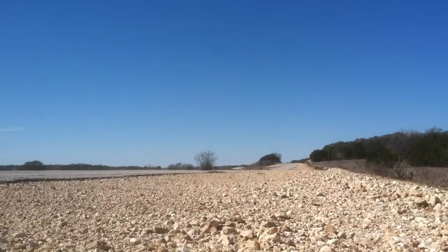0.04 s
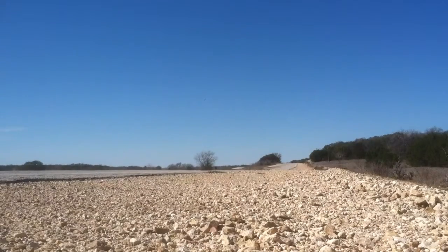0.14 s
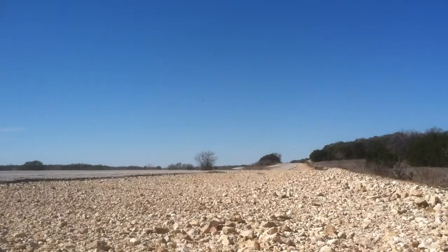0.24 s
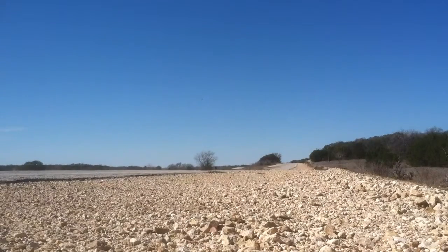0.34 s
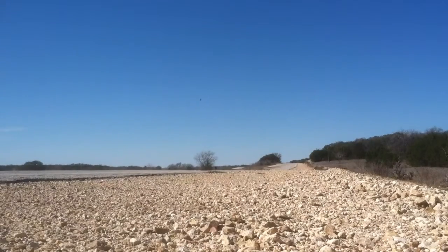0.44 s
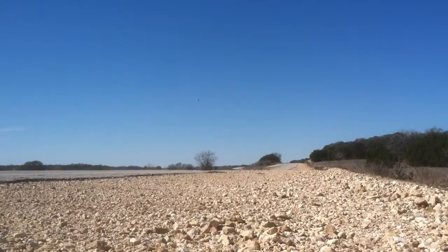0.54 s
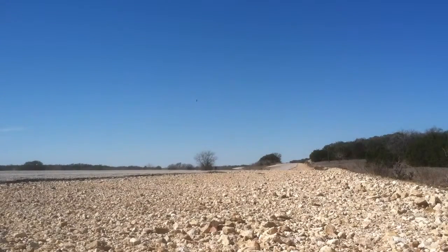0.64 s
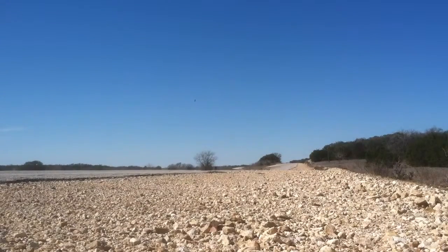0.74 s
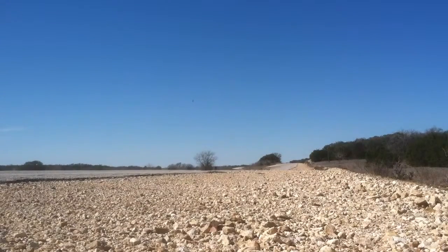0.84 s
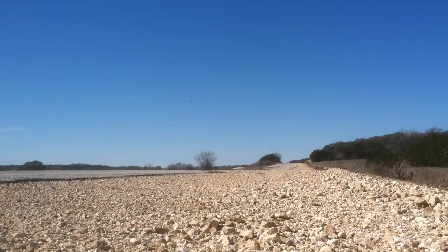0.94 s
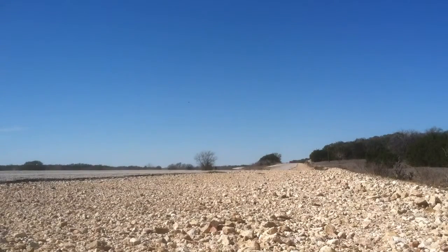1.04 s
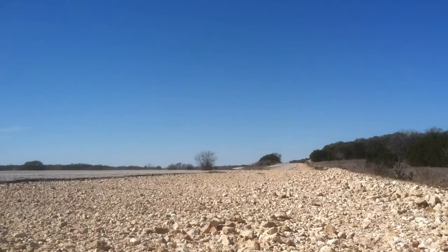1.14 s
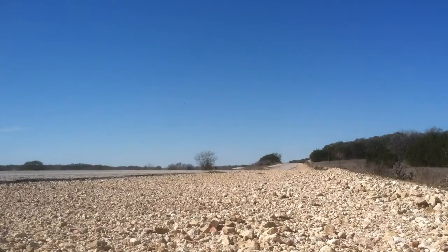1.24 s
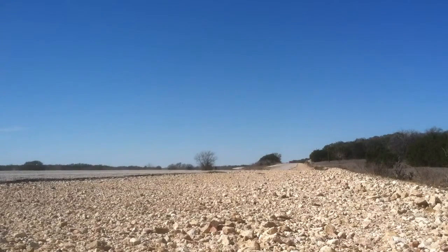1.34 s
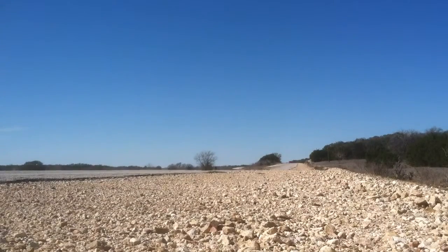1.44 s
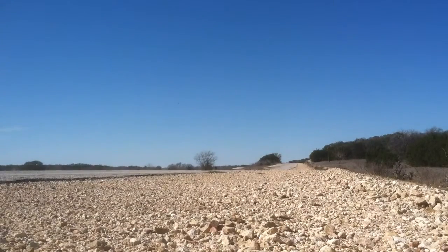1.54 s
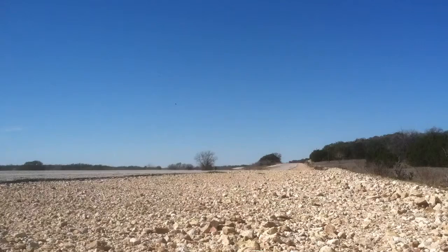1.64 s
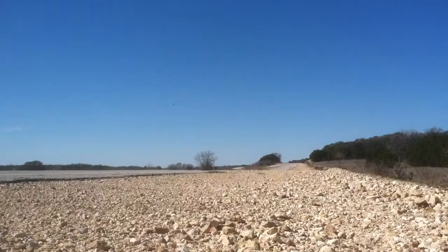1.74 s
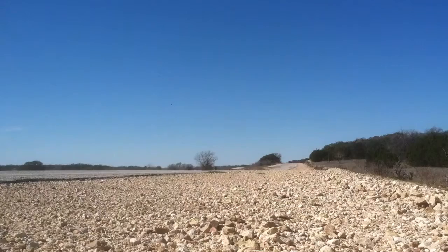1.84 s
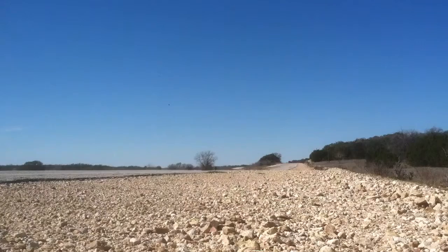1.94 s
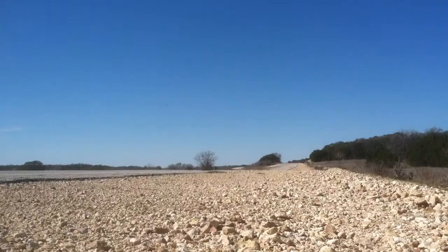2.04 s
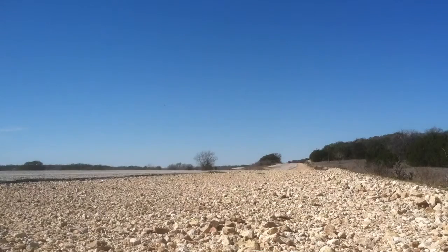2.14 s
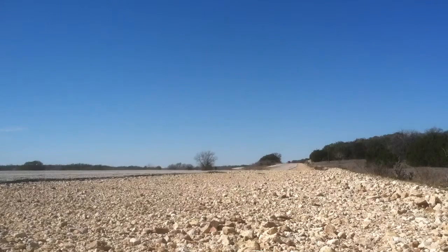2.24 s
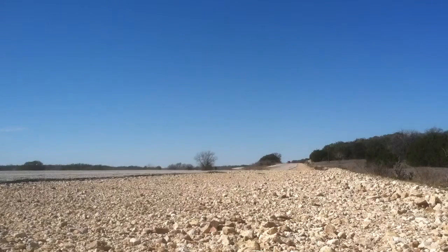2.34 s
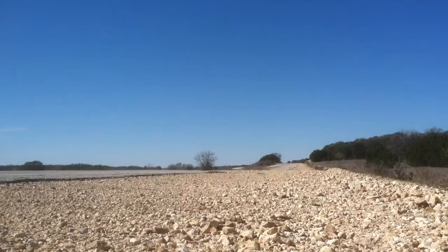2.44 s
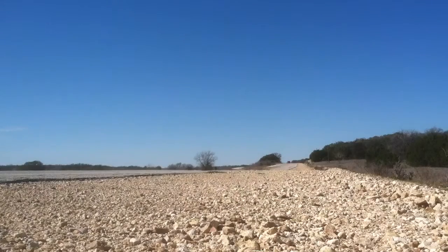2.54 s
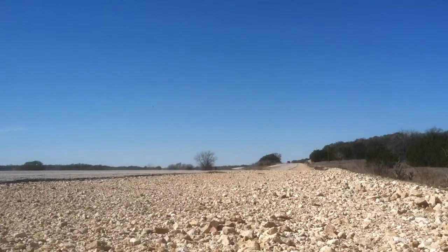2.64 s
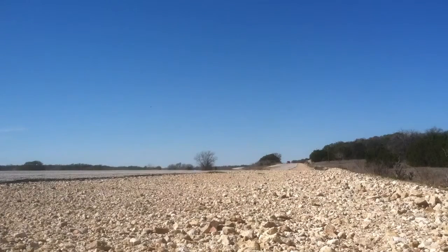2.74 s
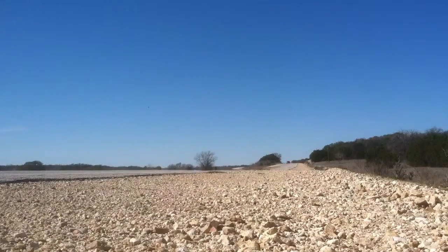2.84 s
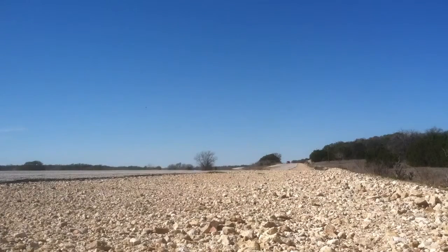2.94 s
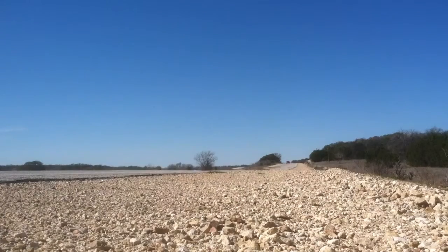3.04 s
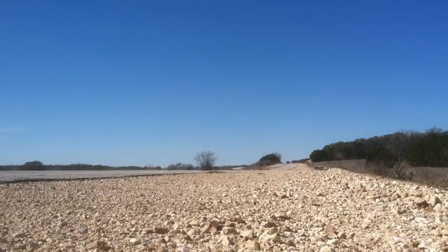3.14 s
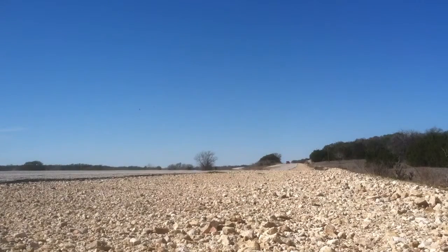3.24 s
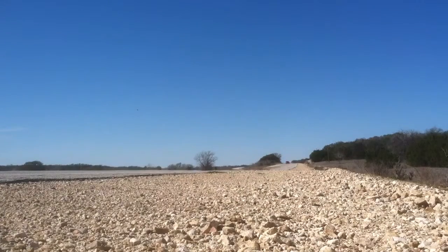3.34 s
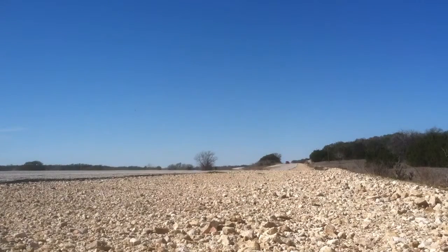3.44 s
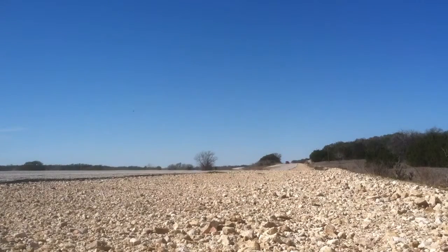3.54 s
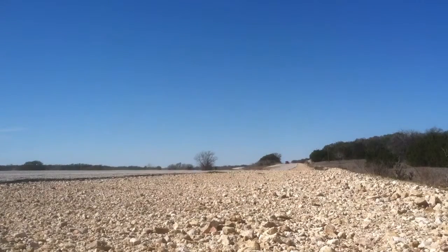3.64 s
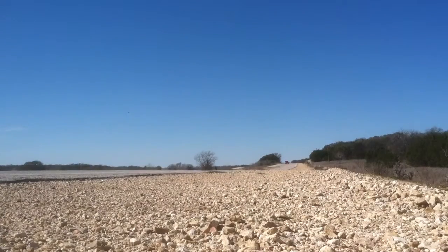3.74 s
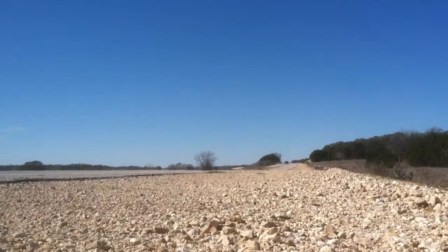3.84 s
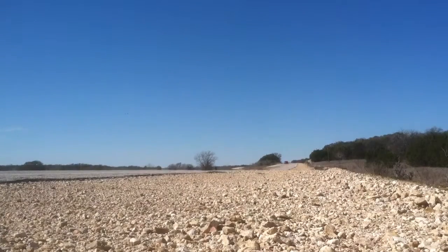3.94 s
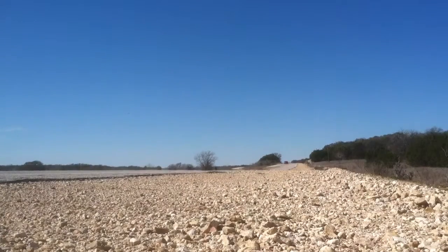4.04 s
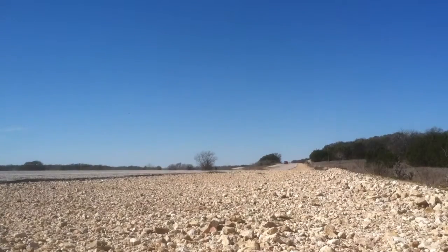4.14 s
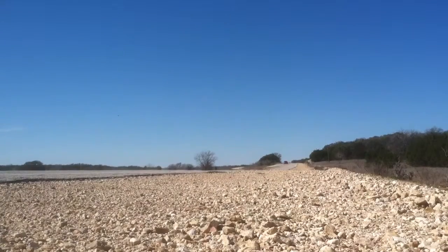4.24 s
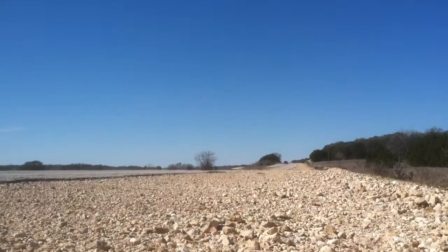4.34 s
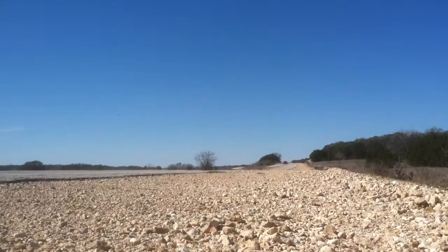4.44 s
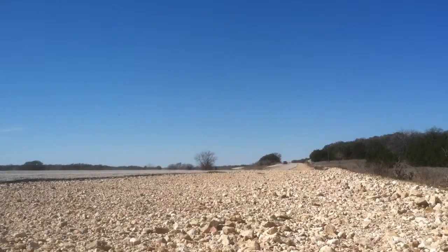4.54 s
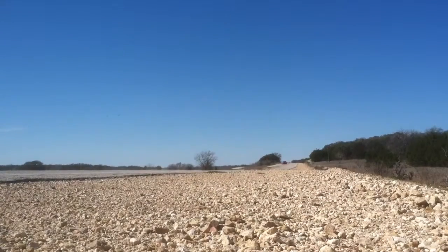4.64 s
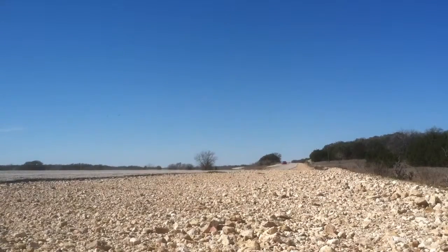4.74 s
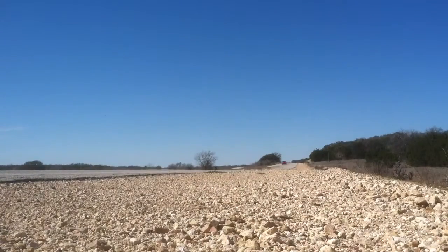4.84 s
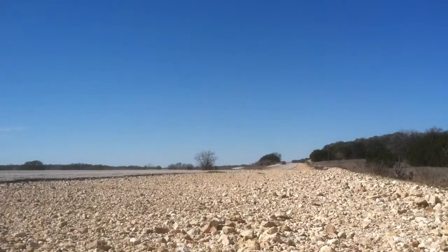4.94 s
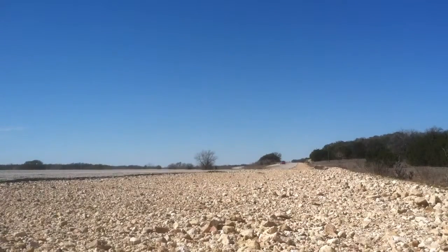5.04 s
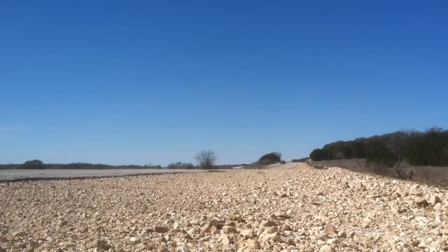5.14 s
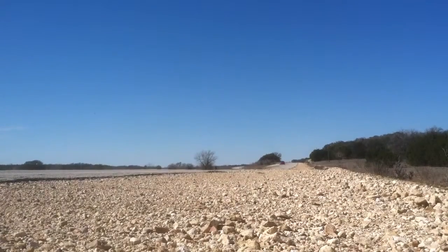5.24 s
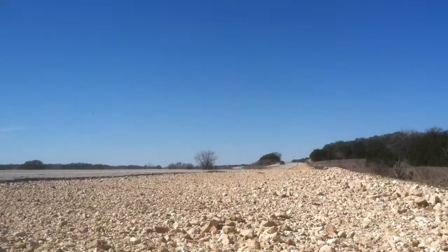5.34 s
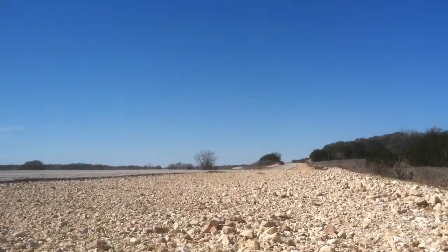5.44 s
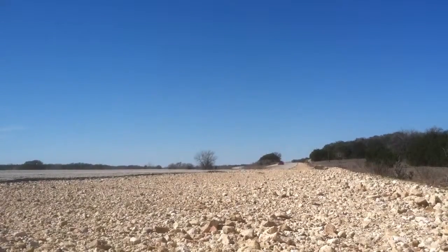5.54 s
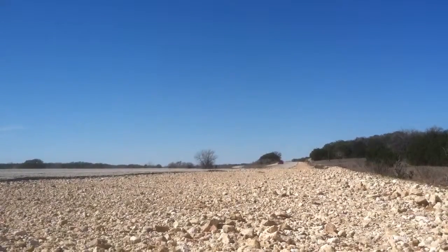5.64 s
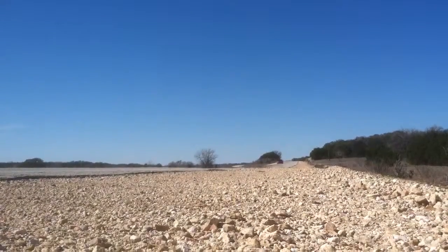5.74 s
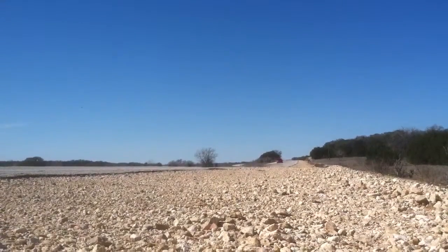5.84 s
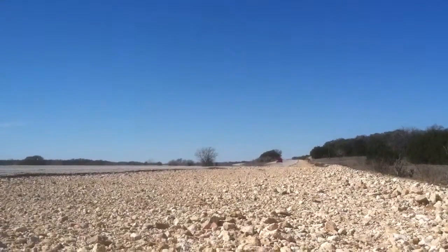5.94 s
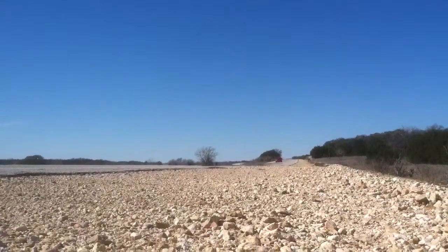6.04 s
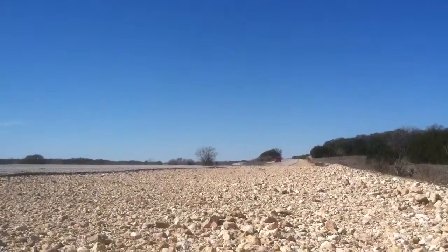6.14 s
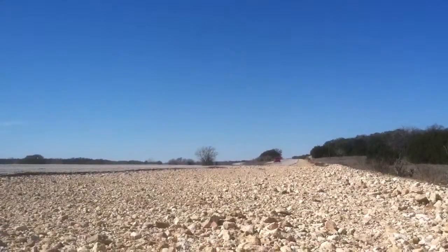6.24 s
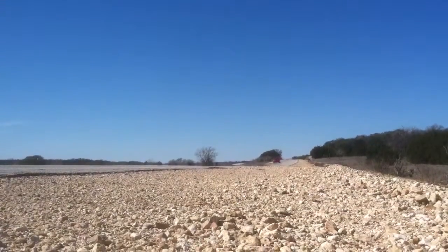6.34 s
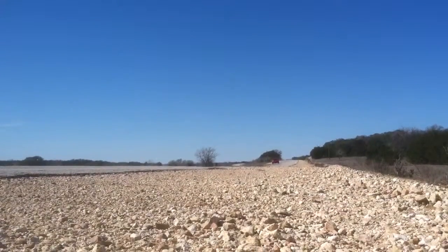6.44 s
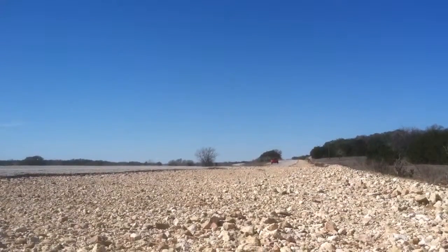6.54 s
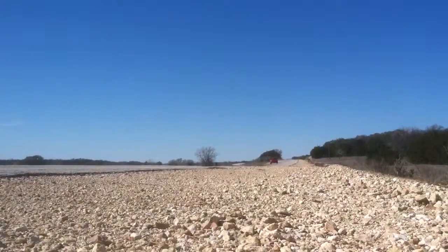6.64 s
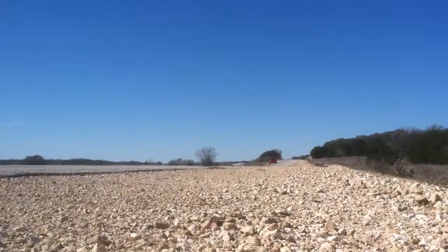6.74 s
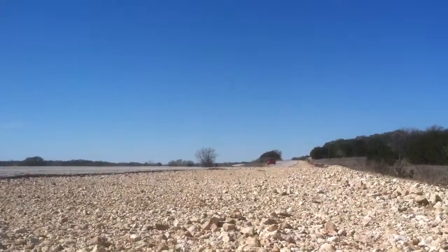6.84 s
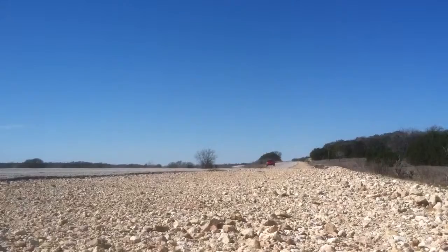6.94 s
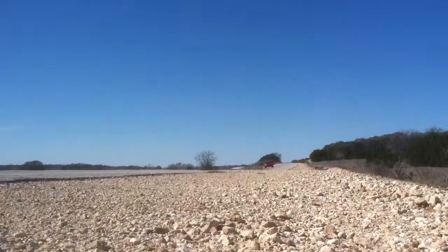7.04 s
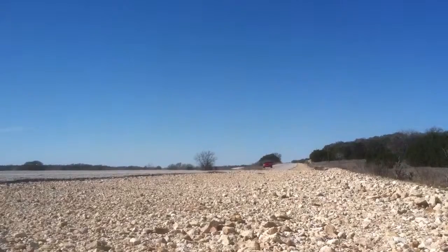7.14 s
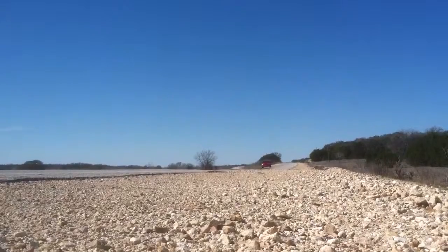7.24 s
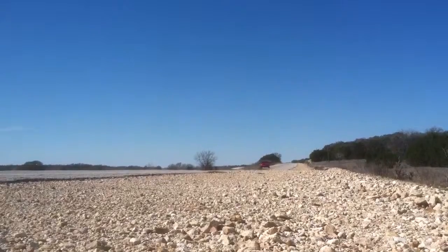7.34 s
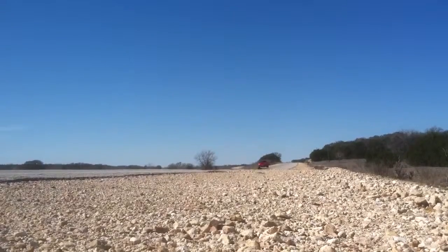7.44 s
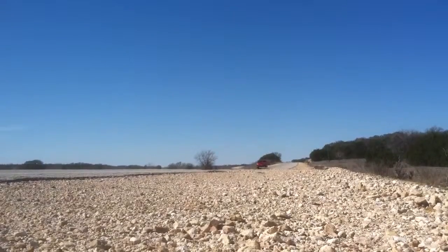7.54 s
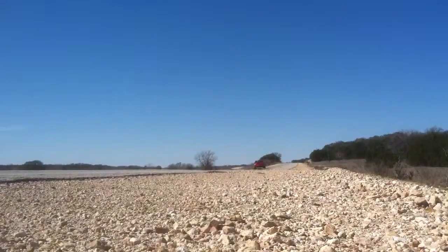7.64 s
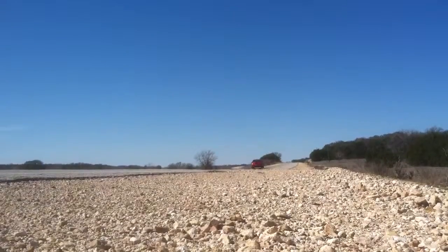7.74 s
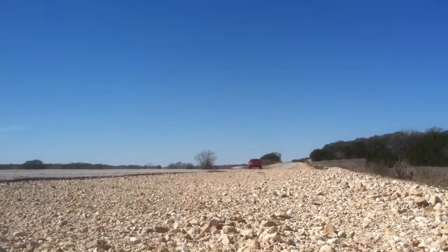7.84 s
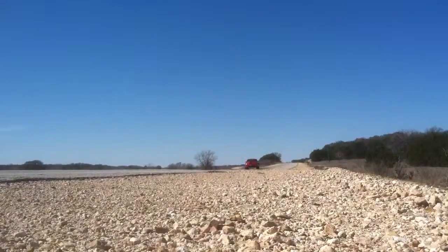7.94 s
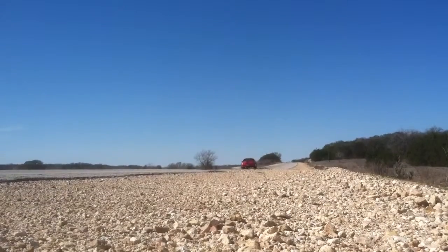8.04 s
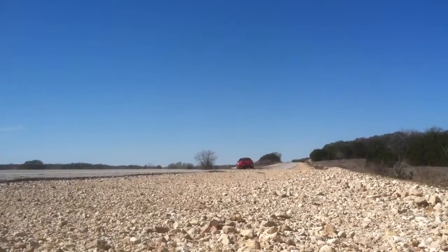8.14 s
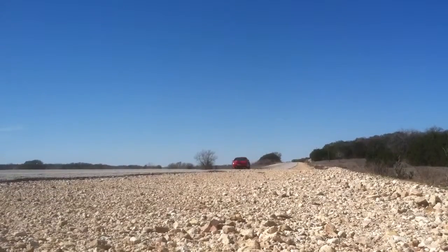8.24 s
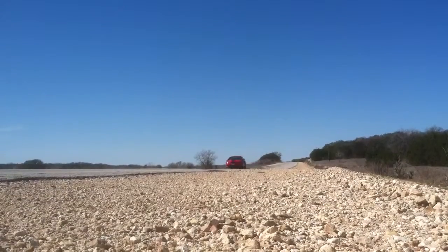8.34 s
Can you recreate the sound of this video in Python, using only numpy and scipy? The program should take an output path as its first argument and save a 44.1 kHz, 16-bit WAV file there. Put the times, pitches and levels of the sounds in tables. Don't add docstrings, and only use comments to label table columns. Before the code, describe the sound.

A powerful car approaches under continuous acceleration, starting as a quiet, fluttering hum over recorder hiss and climbing smoothly. Tiny stone ticks and soft wind bumps appear midway. In the last two seconds the exhaust becomes loud, throbbing and brighter, tyre noise rushes in and gravel snaps hard. Open, dry country air, microphone near the ground; the car never passes, and the end is a sudden cut.

```python
import sys
import numpy as np
from scipy import signal
from scipy.fft import rfft, irfft
from scipy.io import wavfile
from scipy.ndimage import uniform_filter1d

SR = 44100
rng = np.random.default_rng(int(sys.argv[2]) if len(sys.argv) > 2 else 0)


def invert_db(x):
    u = np.asarray(x, float) / 20
    return 10 ** u


def master(y):
    cut = np.clip(np.atleast_2d(y).T, -1, 1)
    pcm = np.round(cut * 32767)
    wavfile.write(sys.argv[1], SR, pcm.astype(np.int16))


N = 369999

# (time [s], rate [engine cycles per s])
REVS = [(0, 29.75), (.8, 32.57), (1.5, 35.11), (2.3, 38.1), (3.1, 41.32), (3.9, 44.42), (4.7, 47.68),
        (5.4, 50.24), (6.1, 52.73), (6.8, 55.02), (7.4, 57.15), (7.9, 58.66), (8.39, 60.16)]
# (time [s], nearness of exhaust note [dB], nearness of roar [dB], clearness of line of sight [dB])
CAR = [(0, -0.1, -1.5, 2.5), (.8, 5, -2, 2.5), (1.5, 2.2, 2, -3), (2.05, 3.5, 0.5, 2), (2.6, 7.5, 4, 0),
       (3.2, 4, 5, 4), (3.7, 5.5, 2, 3.5), (4.2, 2.5, 4.5, 0.5), (4.6, 7.5, 7, -1), (5.15, 11, 10.5, 0.5),
       (5.7, 12.5, 13.5, -6.5), (6.2, 14, 14, -4), (6.6, 18.5, 16, 6), (6.85, 20.5, 19.5, 0),
       (7.1, 23.5, 19.5, -3), (7.4, 21.5, 17, 9), (7.78, 25.5, 21.5, 10.5), (8.39, 31.5, 24.5, 2.5)]
# (multiple of cycle rate, rms level [dB])
STRONG = [(8, -55.5), (5, -70.5), (4, -77.5), (3, -78.5), (16, -69), (6, -74.5), (7, -75.5), (9, -63.5),
          (10, -68.5), (11, -71.5), (13, -74), (12, -73.5)]
# (multiple of cycle rate, level over the -72 dB they have from afar [dB])
WEAK = [(14, -5), (15, -5), (17, -11.5), (18, -8), (19, -12), (20, -14), (21, -13), (22, -13), (24, -14)]
# (time [s], multiple of cycle rate, swell [dB], half-length [s])
FADES = [(0, 7, -9.5, 2.0), (0, 8, -10.5, 0.15), (.09, 10, 8, .24), (.24, 13, 12.5, 0.33),
         (6.1, 11, 5.5, 1.2), (1.5, 10, -19, .69), (1.52, 16, 5.5, 0.37), (1.56, 8, -4, 2.3),
         (1.661, 9, -41, 0.5), (2.154, 16, 15, 0.17), (2.18, 6, -19, 0.69), (8.202, 12, 4, 0.26),
         (2.88, 5, -2, 0.6), (1.096, 16, -8.5, 0.23), (3.44, 16, 4, 0.45), (3.66, 8, -17.5, 0.55),
         (3.407, 9, -17, 0.63), (3.847, 8, 15.5, 0.25), (4.175, 7, 12, 0.2), (4.446, 5, -16, 0.064),
         (4.871, 10, 9, 0.78), (5.43, 12, 8.5, 0.73), (5.717, 16, -16, 0.49), (6.629, 7, 11.5, 0.8),
         (6.783, 5, 6, 1.06), (7.75, 9, -13.5, .65), (6.299, 10, 3.5, 0.66), (7.871, 3, -5, 0.24),
         (7.94, 10, -8.5, .74), (8.099, 18, 9.5, 0.34)]


def orders(cycle, flutter_db, fade_db, wobble):
    t = np.arange(N) / SR
    rate, = in_time(REVS)
    near_db = in_time(CAR)[0]
    levels = dict(STRONG)
    for k, db in WEAK:
        levels[k] = -72 + db + fade_db * drift(2.0)

    out = 0
    for k, order_db in levels.items():
        db = order_db + near_db + np.interp(t, t[::64], pipe_db(k * rate[::64]))
        for s, order, swell_db, half_s in FADES:
            if order == k:
                db = db + swell_db * bell(t, s, half_s)
        if k > 10:
            db = db + 2.0 * drift(22)
        order_wobble = wobble * (4 if k > 18 else 1)
        phase = k * (cycle + order_wobble * drift(7.7)) + rng.uniform(0, 2 * np.pi)
        order_flutter_db = flutter_db * (1.0 if k in (8, 5, 4) else 1.5)
        out = out + np.sqrt(2) * invert_db(db + order_flutter_db * drift(5.0)) * np.sin(phase)
    return out


# (frequency [Hz], width [Hz], gain [dB])
PIPE = [(171.5, 40.7, 16.5), (185, 4.5, -7), (217.9, 18.7, 10.5), (243.5, 33.7, 10.5), (327, 33.5, 12.5),
        (349.5, 6, -8), (378, 8.2, -2.5), (394.6, 8, 2.5), (437, 25, 3), (547, 29, 1), (625, 12, -9),
        (880, 97, -7), (945, 12, 4)]


def pipe_db(hz):
    bass_cut_db = 17 * np.minimum(np.log2(hz / 125), 0)
    return bass_cut_db + sum(db * bell(hz, top, width) for top, width, db in PIPE)


ROAR_EDGES_HZ = [60, 700, 1400, 3700, 12000]
# (frequency [Hz], level [dB per Hz])
ROAR_COLOUR = [(60, -22.5), (125, 6.5), (190, 10), (290, 8), (420, 4), (890, -11.5), (1300, -19.5),
               (1700, -24), (2500, -37), (3200, -47), (4200, -59), (6500, -68), (9000, -77), (12000, -92)]
# (rms level [dB], share of nearness, share of clearness)
ROAR_PARTS = [
    (-63, 0.94, 0.029),
    (-56.5, 0.68, 0.79),
    (-69.5, 1.006, 1.01),
    (-109, 1.73, .3),
]
# (time [s], centre [Hz], lift [dB], width [octaves])
BOUNCE = [(0, 1243, 7.5, 0.27), (.96, 1260, 1, 0.22), (1.9, 1220, 3, 0.15), (2.05, 583, 1.5, .3),
          (2.36, 845, 7, 0.32), (2.6, 1070, 9.5, .3), (3.0, 1230, 7.5, .3), (3.35, 1390, -1, 0.27),
          (4.1, 1240, 5, 0.49), (5.1, 1220, 4, .3), (5.5, 1890, 6.5, 0.65), (6.1, 1504, 4.5, 0.25),
          (6.5, 1870, 2, 0.27), (6.77, 2060, 13, 0.5), (7.0, 1900, 5, 0.56), (7.17, 1047, 4, .3),
          (7.76, 1450, 1.5, 0.94), (8.39, 1000, 4, 0.28)]
BOUNCE_COMB = [
    (.6, -0.034),
    (1.0, 1.0),
    (1.75, 0.26),
]


def roar(cycle, low_extra_db, patchy_db, throb):
    edges = 60 * 2 ** np.arange(0, 7.7, .25)
    centres = np.sqrt(edges[1:] * edges[:-1])
    band_db = at_hz(ROAR_COLOUR, centres) + 10 * np.log10(np.diff(edges))
    group = np.digitize(centres, ROAR_EDGES_HZ[1:-1])

    _, near_db, clear_db = in_time(CAR)
    levels = np.array([db + nears * near_db + clears * clear_db for db, nears, clears in ROAR_PARTS])
    levels[3] = np.maximum(levels[3], -84)
    near = np.clip((levels[1] + 55) / 22, .2, 1)
    levels[0] += low_extra_db
    for g in range(4):
        levels[g] -= 10 * np.log10(np.sum(invert_db(band_db[group == g]) ** 2))

    place = np.interp(np.log(centres), np.log([400, 1000, 2200, 4800]), np.arange(4))
    bounce_hz, lift_db, bounce_octaves = in_time(BOUNCE)
    bounce_log = np.log2(bounce_hz)
    white = rng.standard_normal((2, N))
    white = white + invert_db(-12.5 + 6.3 * near) * crackle(per_s=220, spread_db=3.0)
    together = drift(7.9)
    bands = []
    for k, hz in enumerate(centres):
        below = min(int(place[k]), 2)
        level_db = levels[below] + (place[k] - below) * (levels[below + 1] - levels[below])
        for times, share in BOUNCE_COMB:
            level_db += lift_db * share * bell(np.log2(hz / times), bounce_log, bounce_octaves)
        level_db += patchy_db * (0.24 * together + drift(1.9) + 0.61 * drift(5.1))
        noise = rms_one(band(white[k % 2], edges[k], edges[k + 1]))
        bands.append(invert_db(band_db[k] + level_db) * noise)

    low, rasp, high = sum(bands[:13]), sum(bands[13:24]), sum(bands[24:])
    beat = np.cos(2 * cycle) + .6 * np.cos(4 * cycle + 1)
    return low + high + rasp * (1 + throb * near * beat)


def crackle(per_s, spread_db):
    sizes = invert_db(spread_db * np.minimum(rng.exponential(1, N), 4)) * rng.choice([-1, 1], N)
    return rms_one(sizes * (rng.random(N) < per_s / SR))


# (time [s], peak level [dB], pitch [Hz])
STONES = [(0.355, -43, 1190), (1.0201, -51.2, 1230), (2.4211, -40.8, 1730), (2.7678, -36, 1360),
          (2.8506, -39.6, 1220), (3.0218, -39.0, 1350), (3.4982, -41.5, 1800), (4.7422, -39.3, 1520),
          (5.4218, -37.3, 1700), (5.6762, -37.4, 1630), (6.0293, -39.2, 1490), (6.2406, -37.3, 1440),
          (6.4052, -34.9, 1240), (6.7337, -19.5, 1790), (6.7369, -25.1, 1760), (6.85, -24.6, 1860),
          (6.905, -29.3, 1800), (7.1926, -25, 1100), (7.2467, -27, 1360), (7.3013, -26, 1370),
          (7.5498, -21, 1630), (7.7301, -17, 1450), (7.7758, -19.7, 1540), (7.8334, -14, 1450),
          (7.9235, -21.0, 1420), (8.1072, -13.8, 1440), (8.1665, -23.2, 1260), (8.1855, -25.3, 1250),
          (8.2594, -21.8, 1670), (8.3872, -21, 1330)]


def stones(echo_s, echo_db):
    direct = np.zeros(N)
    for s, db, hz in STONES:
        near = np.clip((s - 6.9) / .8, 0, 1)
        longer, lower, louder_db = 1.8 - 1.1 * near, 1 - .25 * near, 7 * near - 2
        half_s = longer * .6 / hz
        add(direct, s, db + louder_db, hz * lower, half_s, np.sin)
    lag = round(echo_s * SR)
    echo = np.concatenate([np.zeros(lag), direct[:-lag]])
    return direct - invert_db(echo_db) * echo


# (time [s], peak level [dB], pitch [Hz], half-length [s])
THUMPS = [(3.69, -52, 110.1, 0.017), (3.91, -55, 100.1, 0.017), (4.2, -61, 100, .02),
          (4.71, -58, 100.1, 0.013), (5.14, -42.5, 120, 0.012), (5.77, -40, 130, .015),
          (5.921, -32, 160, 0.0046), (5.941, -24, 168.1, 0.005), (5.960, -25.5, 171, 0.0055),
          (6.05, -37, 120, 0.013), (6.475, -34, 111, 0.011), (6.601, -24.5, 147.9, 0.0049),
          (6.6387, -12.5, 300, 0.0014), (6.6435, -16.5, 269.3, 0.0018), (6.679, -21.5, 150, 0.0053),
          (6.758, -29, 130.7, 0.0055), (7.84, -46, 90, 0.0079), (8.12, -50, 90, 0.015)]
# (time [s], peak rms level from 51 to 140 Hz [dB], half-length [s])
GUSTS = [(3.683, -57, 0.068), (3.896, -65, 0.046), (4.148, -58, 0.1), (4.7, -63, .04), (5.1, -59, 0.12),
         (5.478, -54.5, .2), (5.79, -45, 0.092), (6.006, -56, 0.21), (6.495, -54.5, 0.15),
         (6.973, -57.5, 0.23), (7.495, -58, .08), (7.85, -54.5, .2), (8.33, -62, .08)]


def wind(lumpy_db):
    thumps = np.zeros(N)
    for s, db, hz, half_s in THUMPS:
        add(thumps, s, db, hz, half_s, np.cos)
    t = np.arange(N) / SR
    calm = invert_db(-82.5)
    gusts = calm + sum(invert_db(db) * bell(t, s, half_s) for s, db, half_s in GUSTS)
    unevenness = invert_db(-2.5 + lumpy_db * drift(14.0))
    lumps = gusts * unevenness * rms_one(band(rng.standard_normal(N), 51, 140))
    rumble = invert_db(-73) * rms_one(signal.lfilter([1], [1, -.99], rng.standard_normal(N)))
    return lumps + rumble - thumps


# (frequency [Hz], level [dB per Hz])
HISS = [(2000, 5.5), (3000, -8.5), (4000, 2), (5000, 0.5), (6300, -0.5), (8000, -3.5), (10000, -9),
        (13000, -12.5), (15700, -16.5)]


def hiss():
    hz = np.maximum(np.fft.rfftfreq(N + 1, 1 / SR), 1)
    spectrum = rfft(rng.standard_normal(N + 1)) * invert_db(at_hz(HISS, hz)) * (hz > 200)
    noise = irfft(spectrum, N + 1)[:N]
    whine = np.sin(2 * np.pi * 15000 * np.arange(N) / SR)
    return invert_db(-73) * rms_one(noise) + invert_db(-104) * whine


def add(out, s, db, hz, half_s, swing):
    first = max(round((s - 3 * half_s) * SR), 0)
    last = min(round((s + 3 * half_s) * SR), N)
    at = np.arange(first, last)
    t = at / SR - s
    out[at] += invert_db(db) * bell(t, 0, half_s) * swing(2 * np.pi * hz * t)


def bell(x, centre, half):
    return np.exp(-((x - centre) / half) ** 2)


def drift(rate):
    r = np.exp(-80 * np.pi * rate / SR)
    slow = signal.lfilter([1], [1, -2 * r, r * r], rng.standard_normal(N // 40 + 2002))
    slow = slow[2000:]
    return np.interp(np.arange(N) / 40, np.arange(len(slow)), rms_one(slow))


def band(x, low_hz, high_hz):
    return signal.sosfilt(signal.butter(3, [low_hz, high_hz], "band", fs=SR, output="sos"), x)


def rms_one(x):
    return x / np.sqrt(np.mean(x ** 2) + 1e-20)


def in_time(rows):
    s, *columns = np.transpose(rows)
    return [np.interp(np.arange(N) / SR, s, c) for c in columns]


def at_hz(points, hz):
    point_hz, point_db = np.transpose(points)
    return np.interp(np.log(hz), np.log(point_hz), point_db)


def scene():
    rate = uniform_filter1d(in_time(REVS)[0], size=SR // 4)
    cycle = 2 * np.pi * np.cumsum(rate) / SR
    car = orders(cycle, flutter_db=1.3, fade_db=4, wobble=.018)
    car += roar(cycle, low_extra_db=5.5, patchy_db=1.1, throb=.3)
    mix = car + stones(echo_s=0.0016, echo_db=-14.5) + wind(lumpy_db=4.5) + hiss()
    return mix[None]


def roll_off(x):
    return signal.sosfilt(signal.butter(12, 15720, fs=SR, output="sos"), x)


def record(dry):
    thin = signal.sosfilt(signal.butter(2, 85, "high", fs=SR, output="sos"), dry)
    since_start = np.arange(N)
    until_end = since_start[::-1]
    fade = np.clip(np.minimum(since_start, 30 * until_end) / (.002 * SR), 0, 1)
    return roll_off(thin * fade)


dry = scene()
out = record(dry)
master(out)
```